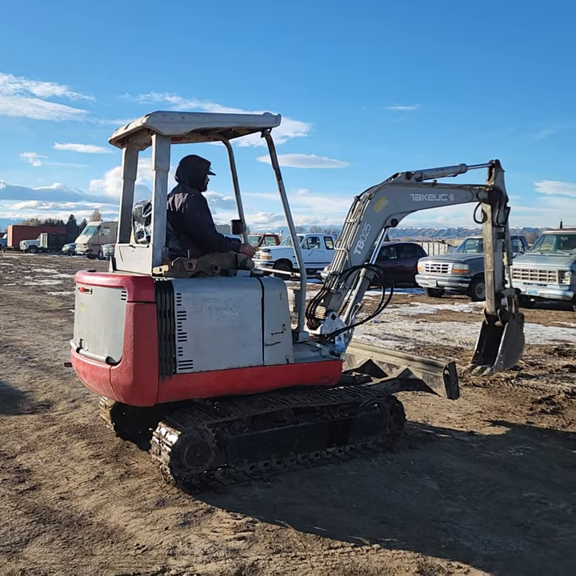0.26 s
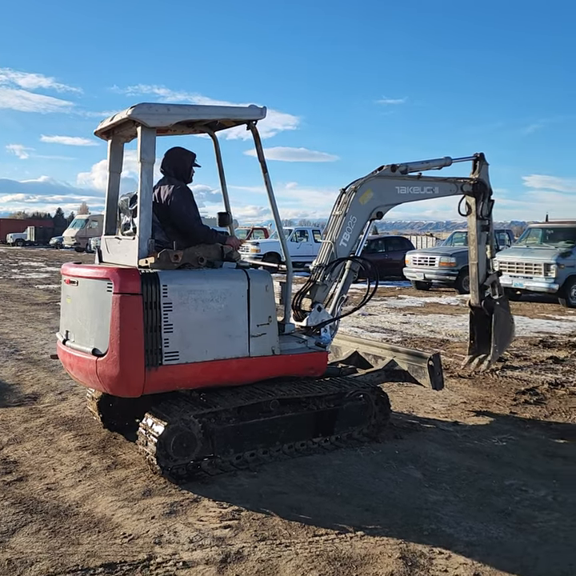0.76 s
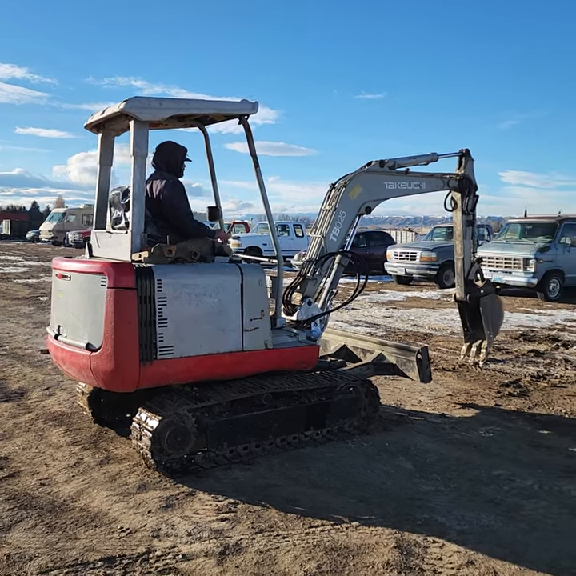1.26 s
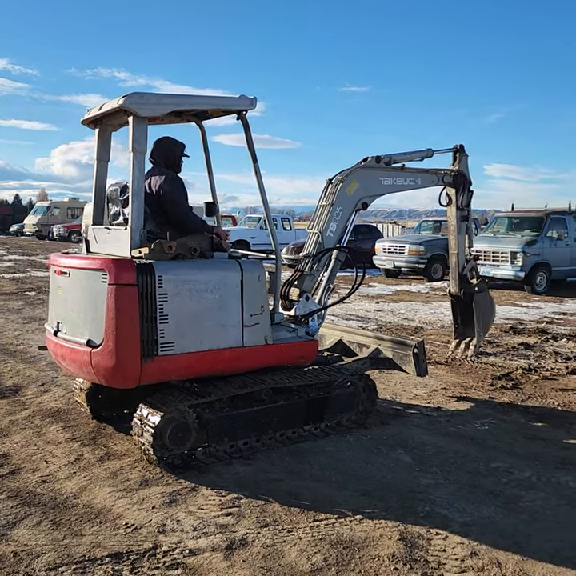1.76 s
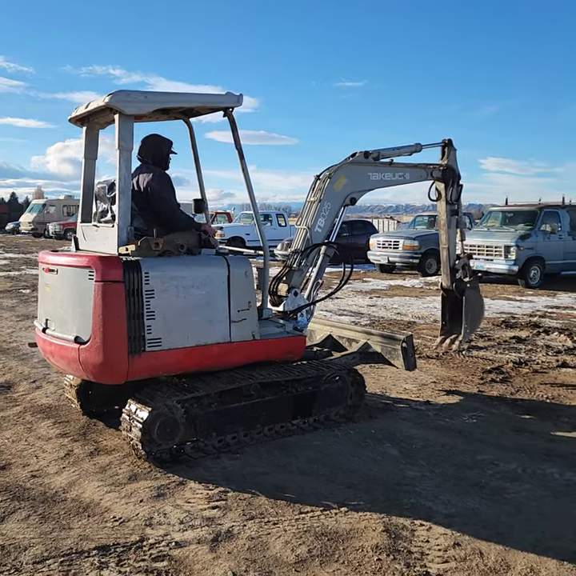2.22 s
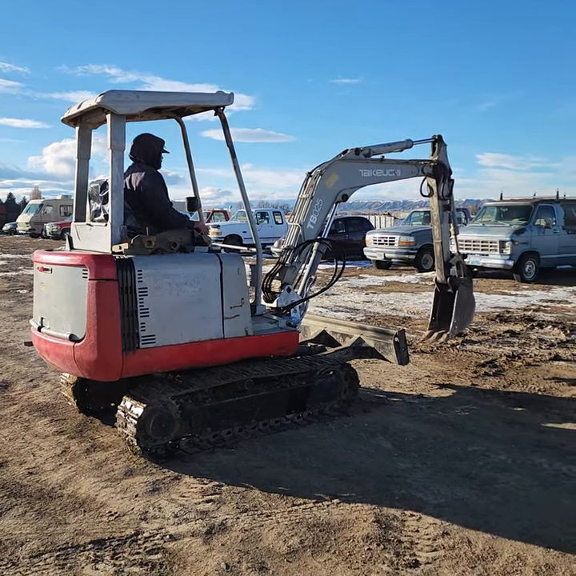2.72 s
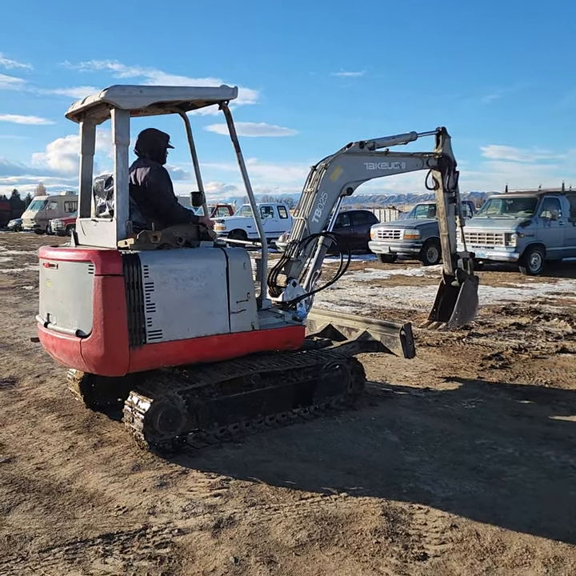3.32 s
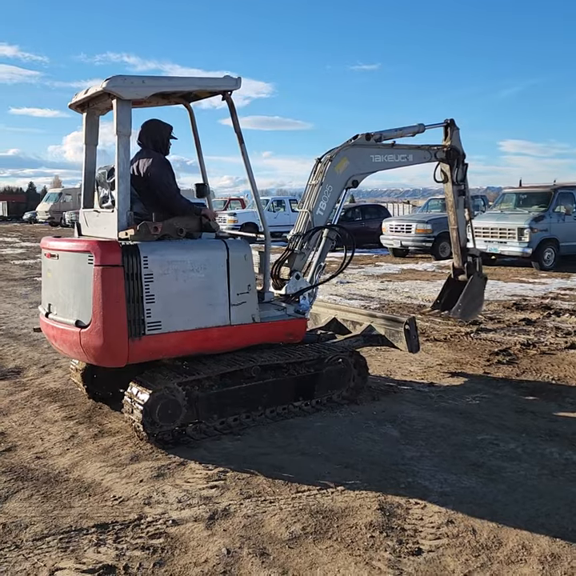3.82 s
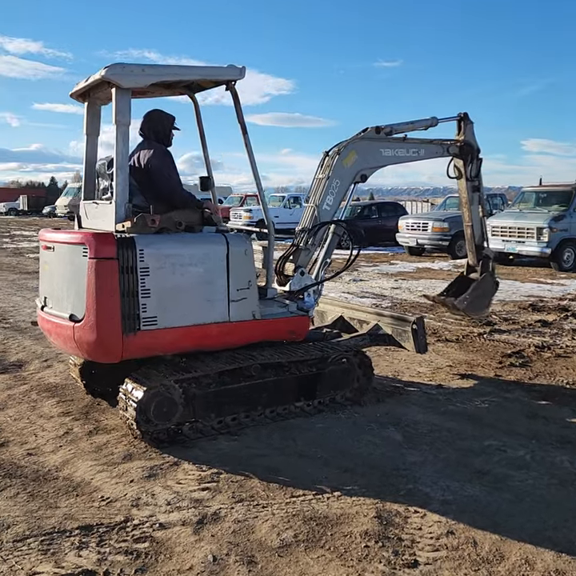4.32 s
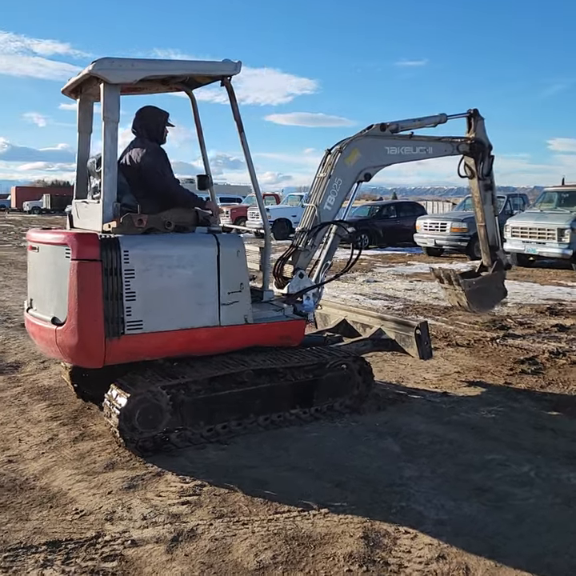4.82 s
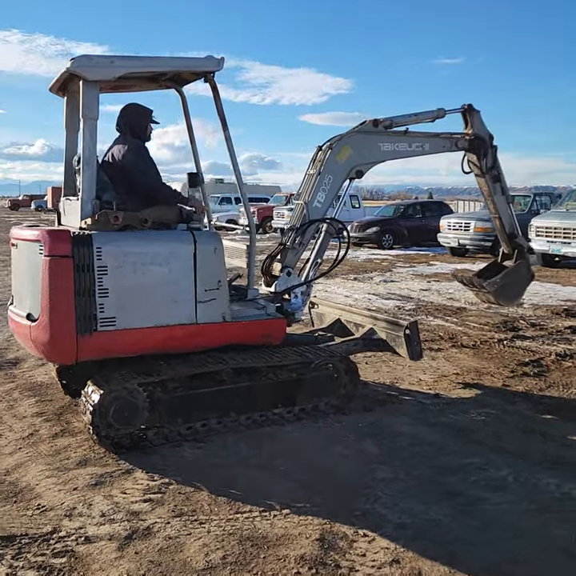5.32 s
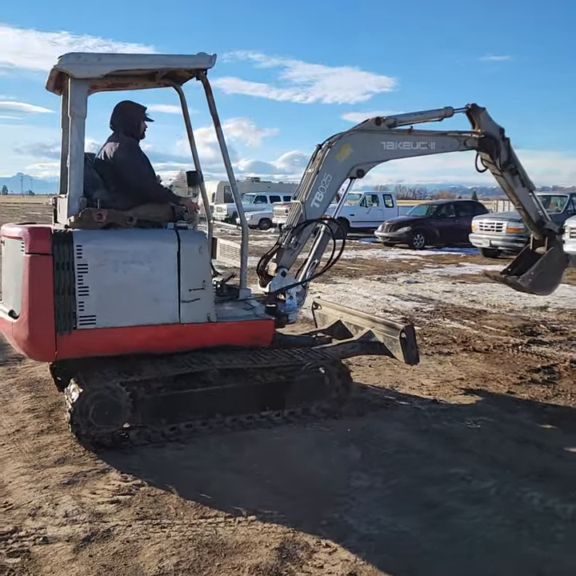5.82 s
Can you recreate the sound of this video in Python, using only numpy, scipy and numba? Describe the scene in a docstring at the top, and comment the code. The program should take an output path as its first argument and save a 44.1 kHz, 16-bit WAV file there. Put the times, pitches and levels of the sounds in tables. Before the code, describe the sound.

A compact excavator works in an open dirt lot, heard a few metres away on a hand-held stereo phone with almost no echo. Its small three-cylinder diesel runs throughout at a nearly unchanging speed: a strong low drone around 125 Hz, dense midrange clatter, a ringing cover rattle near 2 kHz and steady airy hiss. A hard, very short clack comes at 0.05 s. The drone swells until 1.5 s, when wind thumps and flaps briefly, stronger on the left. Two or three sharper metal knocks follow at 2.1-2.3 s, while the drone wavers, dipping near 3.1 s. A dull knock lands at 3.85 s, and the drone weakens again around 4.3 s. From 4.8 s wind returns, buffeting mainly the right in repeated low thumps and fluttering gusts over faint clicks. The engine's treble dulls around 5.5 s, and it keeps running to the end at 6 s.

```python
"""A small excavator works its arm on an open gravel lot, a few metres from a hand-held phone.
From the start its three-cylinder diesel drones (tones) and clatters, hisses and rattles (shaped noise),
over a soft rumble of wind. Now and then a pin or lever knocks: a burst of noise with a faint ring.
At about 1.5 s the wind rises, with flapping gusts and single thumps. It lulls, then returns near 4.8 s
and buffets mostly the right of the two microphone ports until the end."""
import sys
import numpy as np
from scipy import signal
from scipy.fft import rfft, irfft
from scipy.io import wavfile
from scipy.ndimage import uniform_filter1d, map_coordinates
from numba import njit

SR = 44100
rng = np.random.default_rng(int(sys.argv[2]) if len(sys.argv) > 2 else 0)


def file_out(sig):
    """Save sig as 16-bit WAV at sys.argv[1]."""
    # one column per channel
    cols = np.atleast_2d(sig).T
    # limit, then scale
    lim = np.clip(cols, -1, 1)
    pcm = np.round(lim * 32767).astype(np.int16)
    wavfile.write(sys.argv[1], SR, pcm)


N = 267687
TIME = np.arange(N) / SR  # seconds

# engine speed, nearly steady with one brief flare: (time [s], firing rate [Hz])
ENGINE_SPEED = [(0, 62.7), (.35, 62.39), (.8, 62.65), (1.3, 62.78), (1.6, 63.76), (1.9, 62.33),
                (2.35, 62.68), (2.75, 62.9), (3.25, 62.4), (3.9, 62.74), (4.55, 62.82), (5.05, 62.27),
                (6.07, 62.19)]
# the exhaust drone swells and sinks: (time [s], level [dB])
DRONE_LEVEL = [(0, -20.5), (.4, -18.5), (.7, -17), (1.5, -15.5), (1.72, -17.5), (2.22, -22), (2.42, -14),
               (2.68, -23), (2.82, -21.5), (3.1, -28), (3.22, -20.5), (3.5, -23), (3.76, -17), (3.9, -21),
               (4.28, -27.5), (4.58, -16.5), (5.45, -16), (6.07, -17)]
# the engine bay, before each layer's own boost: (time [s], clatter level [dB], hiss level [dB])
BAY_LEVELS = [(0, -34.5, -46.5), (.8, -34.5, -46.5), (1.4, -34.5, -46.5), (1.8, -36, -48.5),
              (2.8, -36, -49), (3.7, -35.5, -47.5), (4.3, -35.3, -49.5), (5.1, -34.5, -47.5),
              (5.65, -38.5, -50), (6.07, -37.5, -51.5)]
# exhaust tones against each other: (multiple of the firing rate [-], level [dB])
EXHAUST_TONES = [(1, -34), (2, 2.5), (3, -13.5), (4, -28)]
# panels and gears that sing with the engine, against each other:
# (multiple of the two-turn cycle rate [-], level [dB])
SINGING_TONES = [(17, -7.5), (20, -14.5), (21, -3.5), (24, 2.5), (26, -6), (27, -12), (36, -6), (40, -8.5),
                 (43, -22), (54, -19.5), (56, -4.5), (57, -7.5), (60, -10.5), (72, -11.5), (86, -13),
                 (88, -4.5)]
# tone colour of the block's clatter: (frequency [Hz], relative level [dB])
BLOCK_COLOUR = [(90, 4), (155, 11.5), (205, 2), (280, -4.5), (420, -0.5), (540, 4), (650, -3), (950, 1),
                (1060, -2), (1200, -1), (1400, -7), (1650, -2), (1980, -1.5), (2300, -13), (3000, -37)]
# tone colour of the injectors' hiss: (frequency [Hz], relative level [dB])
HISS_COLOUR = [(1500, -21), (2400, 1), (3050, 2.5), (3500, -2), (4300, -1.5), (6500, -3.5), (7600, -2.5),
               (8500, -5), (9400, -12.5), (11000, -20), (12000, -12.5), (16000, -19)]
# the three cylinders against each other: (place in the cycle [0-1], knock [dB], injector tick [dB])
CYLINDER_BLOWS = [(0, -4.5, -4.5), (0.335, -2.5, -8.5), (0.665, -1, -3)]
# the phone turns past the machine: (time [s], hiss left minus right [dB], change of the treble [dB])
PHONE_TURN = [(0, 2, -1.5), (1.5, 1.5, -1), (3.7, 1.5, 2), (5.1, 1.5, -3), (5.5, 2, -7), (6.07, 0.5, -3)]
# resonances of the engine cover: (frequency [Hz], width of one filter pass [Hz], relative level [dB])
COVER_RESONANCES = [(1180, 110, -6), (1806, 56, -3.5), (1947, 254, 2)]
# rumble of the wind, which rises twice with a lull between, before trim and puffs: (time [s], level [dB])
BREEZE_LEVEL = [(0, -33), (.7, -25), (1.2, -27), (1.56, -13.5), (1.75, -24), (2.1, -30), (4.6, -33),
                (4.85, -23), (5.12, -26), (5.32, -17), (6.07, -23.5)]
# tone colour of the large eddies: (frequency [Hz], relative level [dB])
EDDY_COLOUR = [(15, -30.5), (30, -23), (62, 0), (100, 3), (160, -6.5), (300, -25), (700, -53), (4000, -100)]
# sharp clacks and dull knocks as the arm works:
# (time [s], level [dB], time to fall by 60 dB [s], centre frequency [Hz], left minus right [dB])
ARM_KNOCKS = [(.054, -17, 0.022, 700, -2), (.468, -35.5, 0.024, 3000, 7), (.9385, -36, .022, 11200, 2),
              (.945, -38, .05, 3500, 14), (2.096, -25.5, 0.06, 2072, -6), (2.1025, -25, 0.023, 3500, -5),
              (2.296, -23, 0.028, 696.5, 1), (2.634, -42, 0.13, 3167, 1), (3.670, -38, 0.027, 8960, 0),
              (3.694, -33.5, 0.042, 4800, -2), (3.844, -19, .03, 480, -2), (5.108, -39, 0.056, 3300, 8),
              (5.124, -36, .07, 4500, 3), (5.163, -39.5, 0.1, 3400, 7), (5.328, -40, 0.15, 3880, -3),
              (5.573, -38, .1, 3100, 1), (5.748, -43, .07, 3600, 1)]
# ways the steel arm rings: (frequency [Hz], relative level [dB], time to fall by 60 dB [s])
STEEL_RING = [(3080, 12.5, 0.088), (3640, -14, .07), (4060, -3, .05), (6261, -15, .05)]
# gusts that strike the ports, levels before a common boost:
# (start [s], hold [s], left level [dB], right level [dB], middle eddy rate [Hz])
GUST_LIST = [(1.51, .015, -14.5, -33, 300.1), (1.585, 0.032, -12.5, -31, 280),
             (4.795, 0.018, -29, -19, 402), (4.841, 0.026, -19, -15, 120), (5.267, 0.011, -25, -16, 655),
             (5.303, .006, -30, -13, 560), (5.345, 0.028, -23, -9.5, 402), (5.39, .01, -33, -15, 350),
             (5.435, 0.039, -25.5, -12, 480), (5.544, 0.042, -26, -12.5, 380.4),
             (5.65, 0.062, -24, -15.5, 400), (5.759, 0.029, -25, -8.5, 220), (5.857, 0.18, -26, -17, 162)]
# tone colour of gusts before the moving low-pass: (frequency [Hz], relative level [dB])
GUST_COLOUR = [(15, -29), (40, -2), (90, 5), (180, -4), (400, -4), (900, -2.5), (1600, -5.5), (3000, -14),
               (8000, -52)]
# single large eddies, levels before a common trim:
# (time of the dip [s], left level [dB], right level [dB], frequency [Hz])
THUMP_LIST = [(1.513, -2, -2, 131), (1.581, -6, -12, 100), (1.631, -7, -24, 70), (2.30, -15, -15, 55.2),
              (2.50, -22, -18, 55), (4.837, -23, -6, 90), (4.853, -1, -16, 70.4), (5.304, -25, -3, 170),
              (5.345, -19, 7, 130), (5.436, -24, 2.5, 149), (5.556, -12, 3, 140.3), (5.676, -31, -9, 200),
              (5.785, -16, -8, 79.8)]

PORT_LAG = 6  # samples by which the right port hears the machine later
WAVER_DB, WAVER_RATE = -32.5, 22  # chance part of the drone: level [dB], changes per second
GUST_ATTACK_S, GUST_RELEASE_S = 0.025, 0.039  # time constants of every gust [s]
TOP_HZ = 15900  # highest pitch kept [Hz]
SIDES = np.array([[1], [-1]]) / 2  # shares a left-minus-right difference between the ports


def undb(db):
    """Turn decibels into a gain."""
    return 10 ** (np.asarray(db) / 20)


def unit(x):
    """Scale to an rms (average strength) of 1."""
    return x / np.sqrt(np.mean(x ** 2))


def curves(table):
    """Join each column of a table by straight lines in time."""
    s, *columns = np.transpose(table)
    return [np.interp(TIME, s, c) for c in columns]


def colour(x, points):
    """Make some pitches stronger than others, joining the points on a log pitch scale; rms 1."""
    hz, db = np.transpose(points)
    f = np.maximum(np.fft.rfftfreq(2 ** 19, 1 / SR), 1)
    gain = undb(np.interp(np.log(f), np.log(hz), db))
    return unit(irfft(rfft(x, 2 * len(f) - 2) * gain)[..., :N])


def walk(rate):
    """A smooth random wander with rms 1, changing about rate times a second."""
    k = max(int(SR / rate), 1)
    held = np.repeat(rng.standard_normal(N // k + 1), k)[:N]
    return unit(uniform_filter1d(uniform_filter1d(held, k), k))


def ports(x, pan_db=0, count=PORT_LAG):
    """Sound from the machine reaches the left port a count of samples earlier."""
    late = np.pad(x, (count, 0))[:N]
    return np.array([x * undb(pan_db / 2), late * undb(-pan_db / 2)])


def blows(cycle, column, decay, scatter_db):
    """Strength of the three firings in each cycle: a jump, then a decay; each differs by chance."""
    out = 0
    for row in CYLINDER_BLOWS:
        count, age = np.divmod(cycle + 1 - row[0], 1)  # age and decay are in cycles
        sizes = undb(row[column] + scatter_db * rng.standard_normal(size=256))
        shape = np.exp(-age / decay) - np.exp(-age / 0.0041)
        out = out + sizes[count.astype(int)] * shape
    return unit(out)


def each_cycle(cycle, size=2048, order=14):
    """A dense random pattern repeats every engine cycle, without its lowest orders."""
    orders = np.arange(size // 2 + 1)
    partials = np.exp(2j * np.pi * rng.random(size // 2 + 1)) * (orders >= order)
    return unit(map_coordinates(irfft(partials), [cycle % 1 * size], order=3, mode="grid-wrap"))


def lope(cycle, depth_db, place=0.75):
    """The uneven cylinders make the shaking swell once in every cycle."""
    return unit(undb(depth_db * np.cos(2 * np.pi * (cycle - place))))


def exhaust(cycle, flutter_db=0.75):
    """The silencer leaves only the lowest multiples of the firing rate; the second is strongest."""
    level_db, = curves(DRONE_LEVEL)
    firing = cycle * len(CYLINDER_BLOWS)
    tones = 0
    for k, db in EXHAUST_TONES:
        flutter = undb(db + flutter_db * walk(25))
        tones = tones + flutter * np.sin(2 * np.pi * (k * firing + rng.random()))
    # the chance part has a fixed strength, so a weak drone wavers more
    strength = undb(level_db) + undb(WAVER_DB) * walk(WAVER_RATE)
    return ports(unit(tones) * strength, pan_db=-0.1)


def clatter(cycle, level_db, block_db=6.5, steady=1.56, fresh=1.0, spread_db=-8, lope_db=0.8):
    """Burning fuel knocks the block; panels scatter the knocks to each port in their own way."""
    knock = (steady + blows(cycle, column=1, decay=0.28, scatter_db=1.0)) * lope(cycle, lope_db)

    def shaken():
        return knock * (each_cycle(cycle) + fresh * rng.standard_normal(N))

    direct = ports(shaken(), count=3)
    scattered = np.array([shaken(), shaken()])
    return colour(direct + undb(spread_db) * scattered, BLOCK_COLOUR) * undb(level_db + block_db)


def singing(cycle, level_db, tones_db=-1.5, waver_db=2.0, slip=0.0022):
    """Panels and gears hum in step with the crankshaft; higher tones waver more in phase."""
    tones = 0
    for k, db in SINGING_TONES:
        phase = k * cycle + rng.random() + slip * k * walk(16)
        tones = tones + undb(db + waver_db * walk(18)) * np.sin(2 * np.pi * phase)
    level = undb(np.mean(level_db) + tones_db)  # one steady level throughout
    return ports(tones * lope(cycle, depth_db=2.5, place=1.0) * level, count=3)


def panels(x, decay_s=0.0054, tail_db=-8, size=2048):
    """Quick reflections inside the engine bay smear each tick and ripple its spectrum."""
    tail = rng.standard_normal((2, size)) * np.exp(-np.arange(size) / SR / decay_s)
    smeared = signal.fftconvolve(x, unit(tail) / np.sqrt(size), axes=1)[:, :N]
    return x + undb(tail_db) * smeared


def hiss(cycle, level_db, hiss_db=7.5, steady=1.47, direct_db=-6, grain_db=0.7, top_hz=9000, shade_db=3):
    """Injectors and valves tick over the rush of fan and oil; the treble is duller at the right port."""
    pan_db, top_db = curves(PHONE_TURN)
    tick = steady + blows(cycle, column=2, decay=0.2, scatter_db=2.55)
    tick = tick * undb(grain_db * walk(1500))
    separate = rng.standard_normal((2, N))
    shared = ports(rng.standard_normal(N))
    air = colour(panels(tick * (separate + undb(direct_db) * shared)), HISS_COLOUR)
    top = signal.sosfiltfilt(signal.butter(2, top_hz, "high", fs=SR, output="sos"), air)
    turned = air + (undb(top_db + shade_db * SIDES) - 1) * top
    return turned * undb(level_db + hiss_db + pan_db * SIDES)


def rattle(cycle, level_db, rattle_db=-1.0, pan_db=-4, steady=0.94, fresh=0.6, decay=0.1, delay=.14, lope_db=2.6):
    """A cover, off to the right, is jolted by each firing and rings much alike in every cycle."""
    force = steady + blows(cycle - delay, column=1, decay=decay, scatter_db=3.1)
    texture = each_cycle(cycle) + fresh * rng.standard_normal(N)
    jolt = force * lope(cycle, lope_db) * texture
    ring = 0
    for hz, width_hz, db in COVER_RESONANCES:
        b, a = signal.iirpeak(hz, hz / width_hz, fs=SR)
        twice = signal.lfilter(b, a, signal.lfilter(b, a, jolt))
        ring = ring + undb(db) * unit(twice)
    return ports(unit(ring) * undb(level_db + rattle_db), pan_db)


def breeze(eddy_db=-2, apart_db=-14, puff_db=3, puff_rate=14):
    """Large eddies rumble in both ports nearly alike, coming in random puffs."""
    level_db, = curves(BREEZE_LEVEL)
    shared = rng.standard_normal(N)
    separate = rng.standard_normal((2, N))
    air = colour(shared + undb(apart_db) * separate, EDDY_COLOUR)
    return air * undb(level_db + eddy_db + puff_db * walk(puff_rate))


def knocks(ring_db=-20, sharpness=1.6, size=16384):
    """Each knock is a short crack of steel on steel and a faint ring of the arm."""
    out, t = np.zeros((2, N + size)), np.arange(size) / SR

    def fade(t60):
        return np.exp(-np.log(1000) * t / t60)  # falls by 60 dB in t60 seconds

    for s, db, t60, hz, pan_db in ARM_KNOCKS:
        noise = rng.standard_normal((2, size)) + rng.standard_normal(size)
        widen = 1 + .5 / sharpness
        band = [hz / widen, min(hz * widen, SR / 2 - 1)]
        crack = unit(signal.lfilter(*signal.butter(2, band, "band", fs=SR), noise))
        ring = 0
        for f, g, d in STEEL_RING:
            closeness = 1 / (1 + (f / hz - hz / f) ** 2)  # modes near the crack's pitch ring most
            wave = np.sin(2 * np.pi * (f * t + rng.random((2, 1))))
            ring = ring + undb(g) * closeness * wave * fade(d)
        hit = crack * fade(t60) + undb(ring_db) * ring
        start = int(s * SR)
        out[:, start:start + size] += hit * undb(db + pan_db * SIDES)
    return out[:, :N]


def gust_shape(start, hold):
    """A gust builds quickly, holds and dies away."""
    build = np.minimum(TIME - start, 0) / GUST_ATTACK_S
    die = np.maximum(TIME - start - hold, 0) / GUST_RELEASE_S
    return np.exp(build - die)


@njit
def low_pass(x, hz, damping):
    """Keep the pitches below a moving limit (state-variable filter)."""
    y, band, low = np.empty(len(x)), 0., 0.
    for i in range(len(x)):
        g = np.tan(np.pi * hz[i] / SR)
        v = (band + g * (x[i] - low)) / (1 + g * (g + damping))
        y[i] = low + g * v
        band, low = 2 * v - band, 2 * y[i] - low
    return y


def gusts(gust_db=1, flap_db=2.0, swirl=0.2, damping=1.0):
    """Small eddies flap at each port alone; their rate swirls about that of the gusts blowing."""
    starts, holds, *ports_db, rates_hz = np.transpose(GUST_LIST)
    shapes = np.array([gust_shape(s, hold) for s, hold in zip(starts, holds)])
    power = shapes ** 2 + 1e-12  # never quite zero, so the average rate always exists
    eddy_hz = rates_hz @ power / power.sum(axis=0)
    out = []
    for port_db in ports_db:
        air = colour(undb(flap_db * walk(200)) * rng.standard_normal(N), GUST_COLOUR)
        flapping = low_pass(air, eddy_hz * np.exp(swirl * walk(120)), damping)
        strength = np.sqrt(undb(port_db + gust_db) ** 2 @ power)
        out.append(flapping * strength)
    return np.array(out)


def thumps(thump_db=-2):
    """A passing whirl of air: pressure rises, dips at its core and rises again."""
    out = np.zeros((2, N))
    for s, left_db, right_db, hz in THUMP_LIST:
        near = np.abs(TIME - s) < 2 / hz
        u = (np.pi * hz * (TIME[near] - s)) ** 2
        pressure = (2 * u - 1) * np.exp(-u)
        out[:, near] += pressure * undb(thump_db + np.array([[left_db], [right_db]]))
    return out


def scene():
    """One crankshaft drives every engine sound; wind and knocks come on top."""
    firing_hz, = curves(ENGINE_SPEED)
    clatter_db, hiss_db = curves(BAY_LEVELS)
    unsteady_hz = firing_hz * (1 + 0.001211 * walk(15))
    cycle = np.cumsum(unsteady_hz) / SR / len(CYLINDER_BLOWS)  # count of two-turn engine cycles
    block = clatter(cycle, clatter_db) + singing(cycle, clatter_db) + rattle(cycle, clatter_db)
    engine = exhaust(cycle) + block + hiss(cycle, hiss_db)
    return engine + breeze() + knocks() + gusts() + thumps()


def record(dry):
    """The phone rounds off the strongest peaks near full scale and cuts the highest pitches."""
    rounded = dry / (1 + dry ** 6) ** (1 / 6)
    return signal.sosfilt(signal.ellip(10, .1, 80, TOP_HZ, fs=SR, output="sos"), rounded)


dry = scene()
out = record(dry)
file_out(out)
```